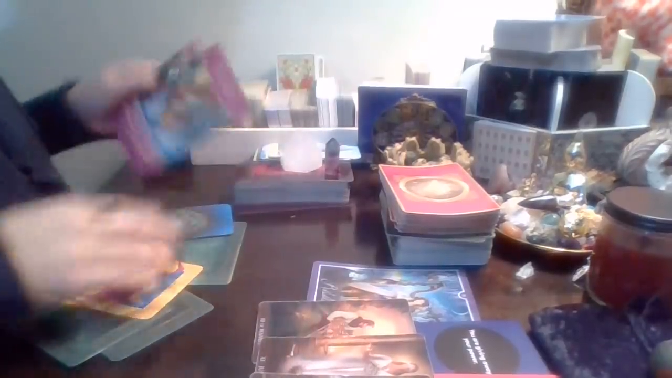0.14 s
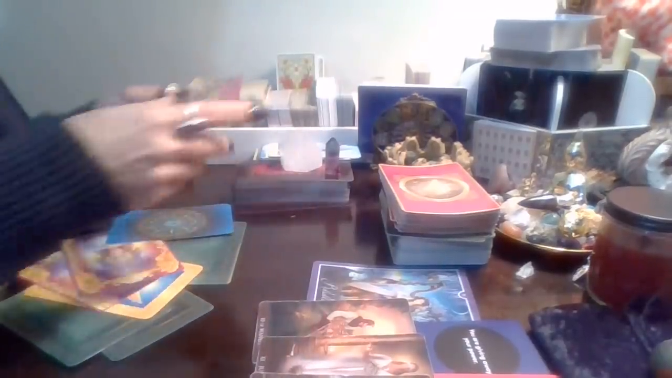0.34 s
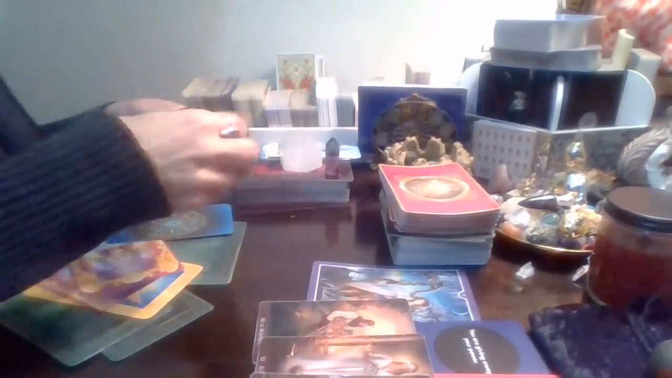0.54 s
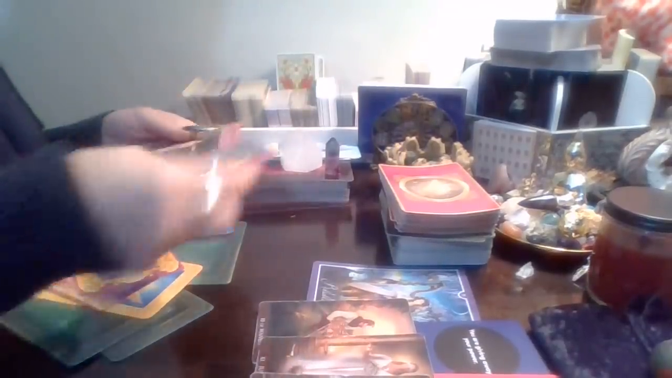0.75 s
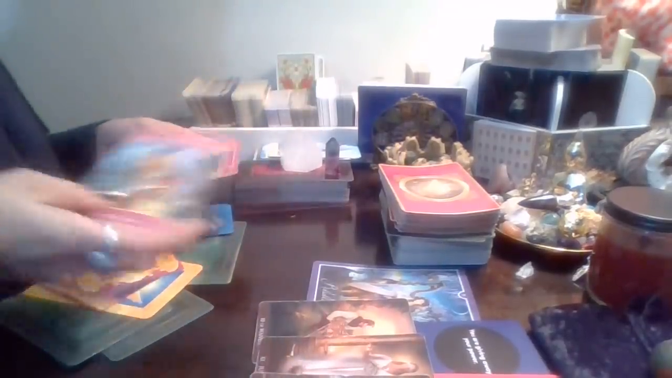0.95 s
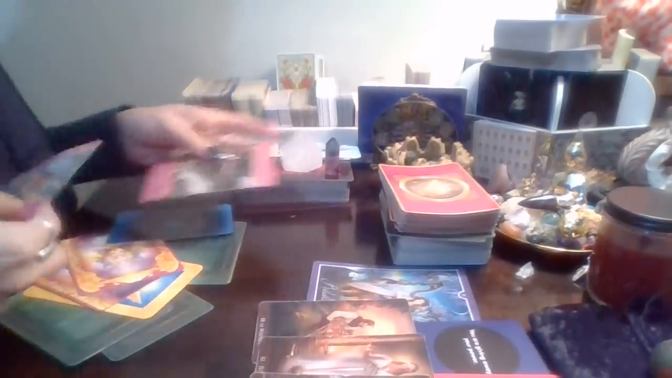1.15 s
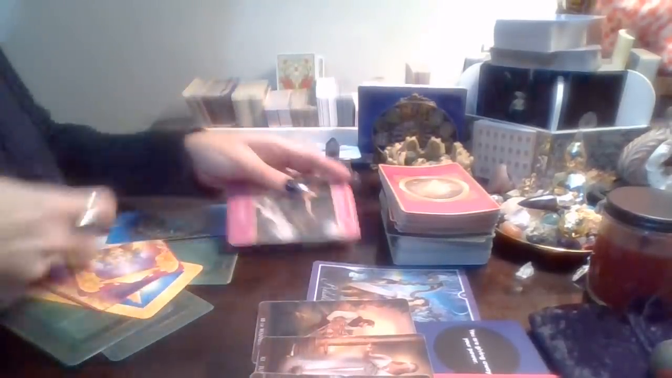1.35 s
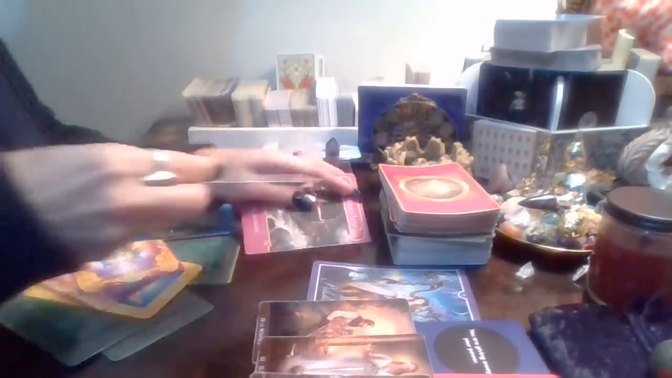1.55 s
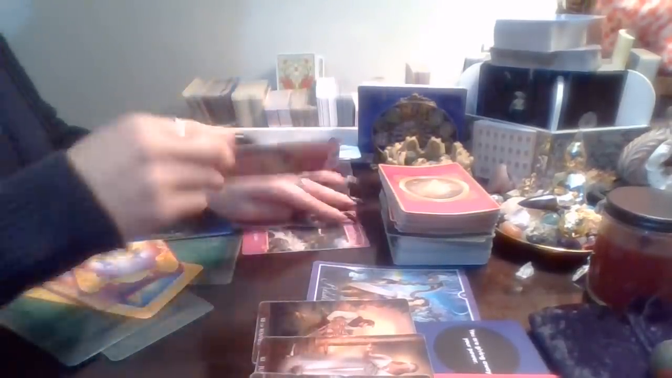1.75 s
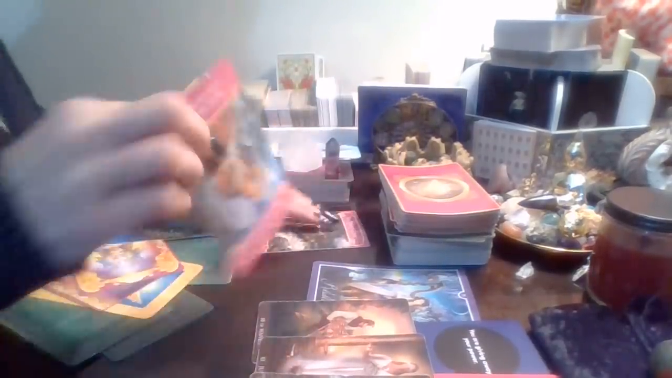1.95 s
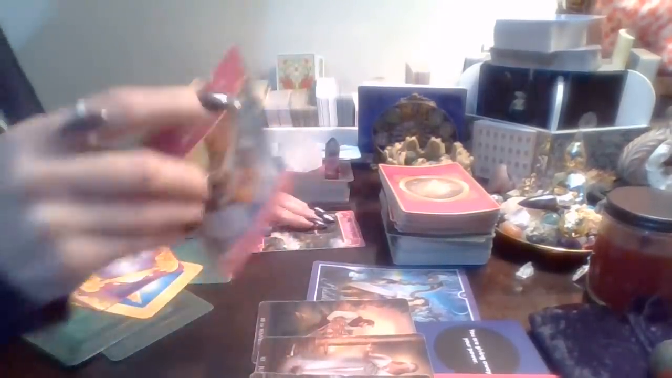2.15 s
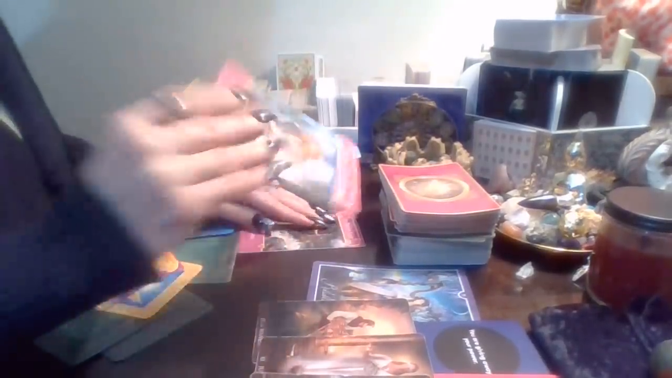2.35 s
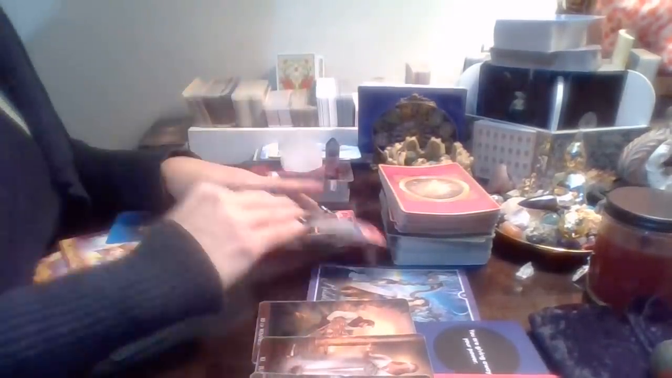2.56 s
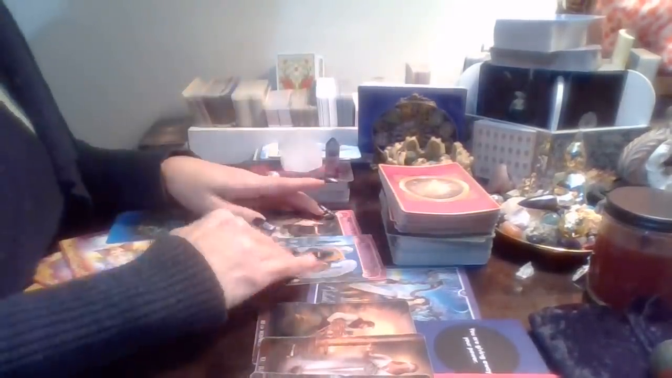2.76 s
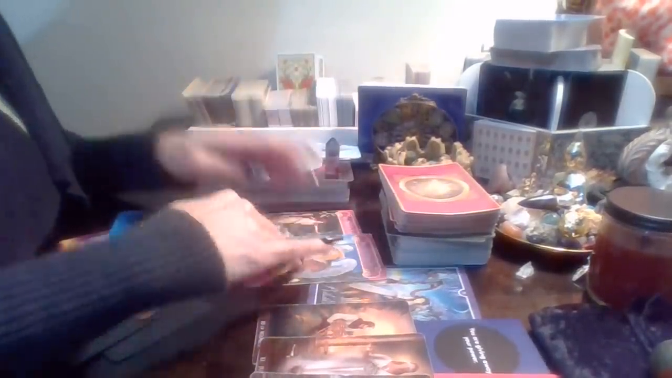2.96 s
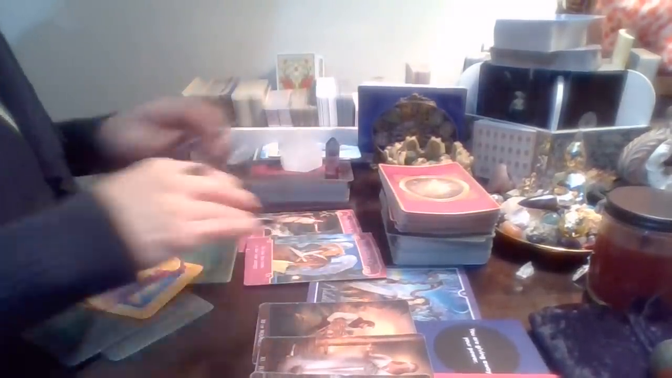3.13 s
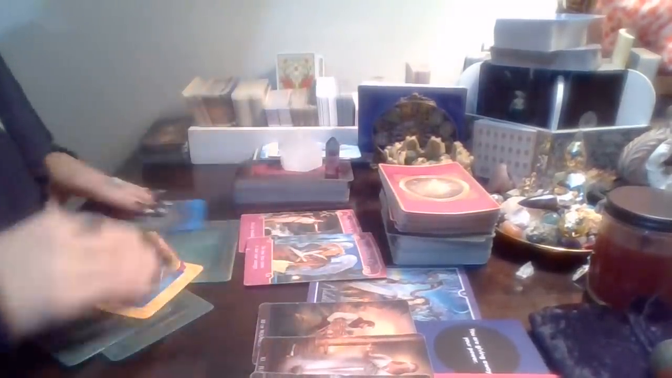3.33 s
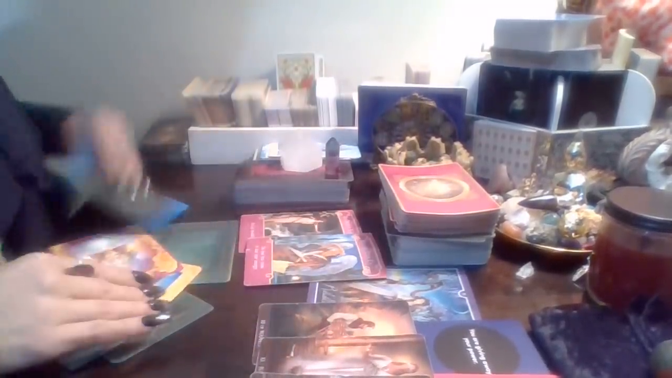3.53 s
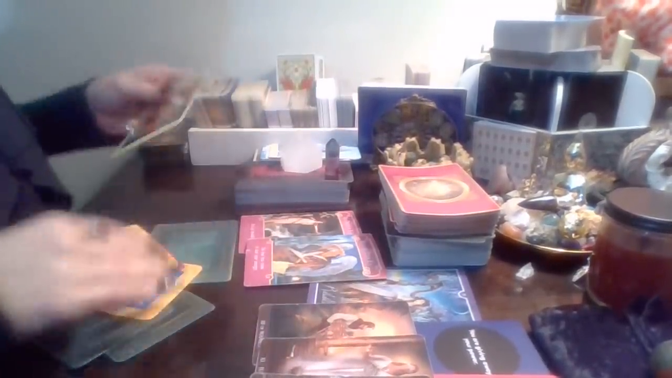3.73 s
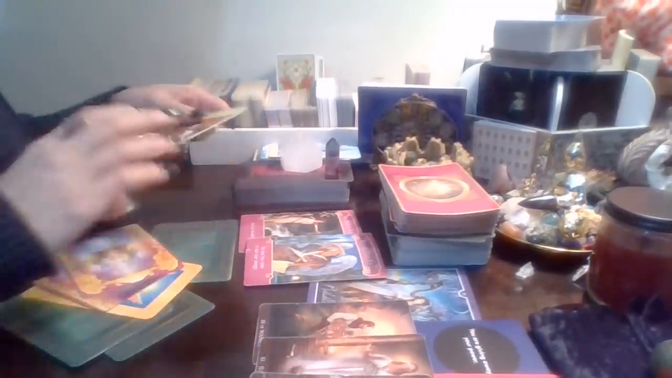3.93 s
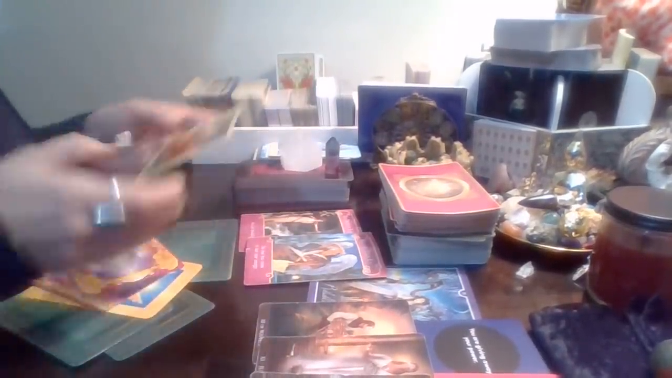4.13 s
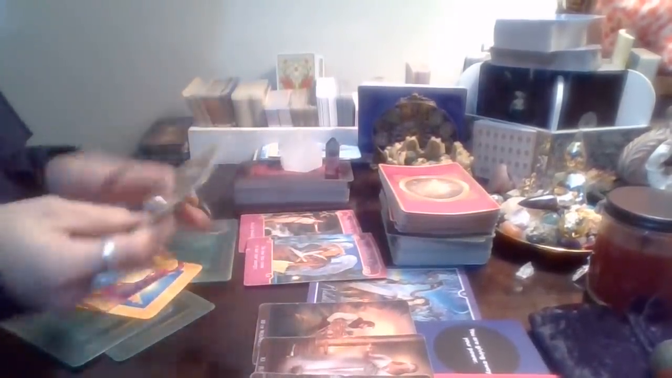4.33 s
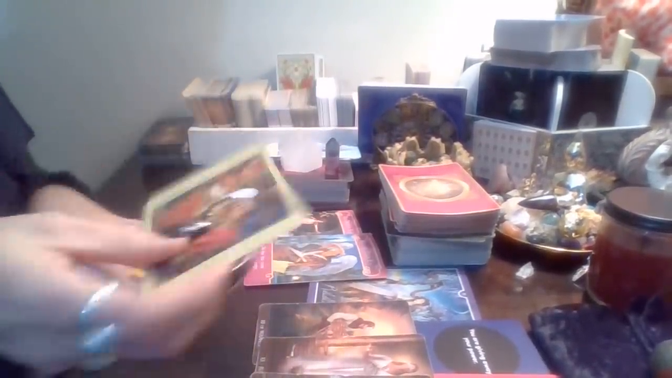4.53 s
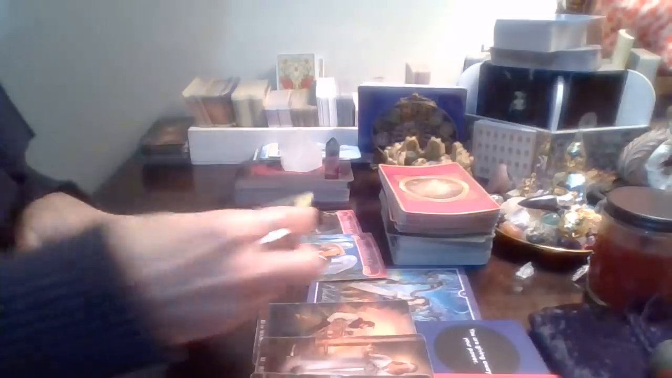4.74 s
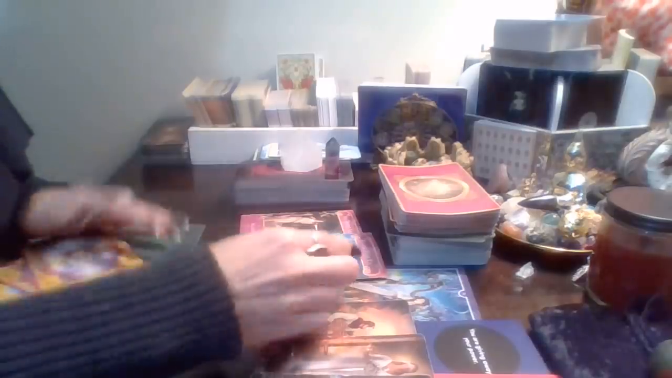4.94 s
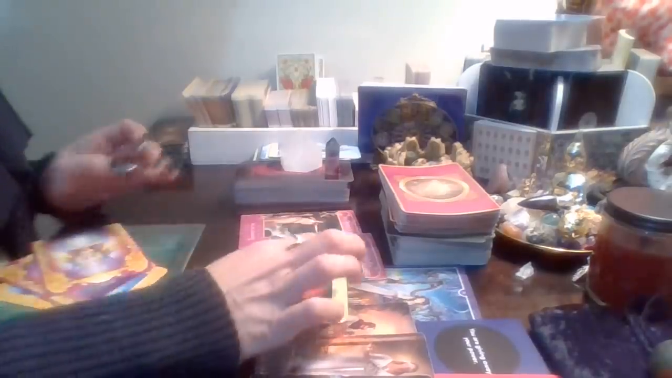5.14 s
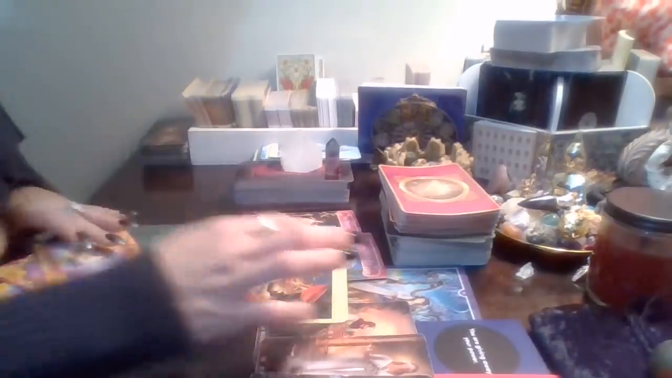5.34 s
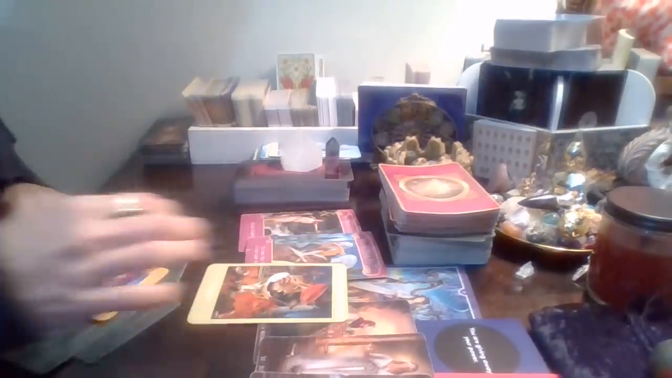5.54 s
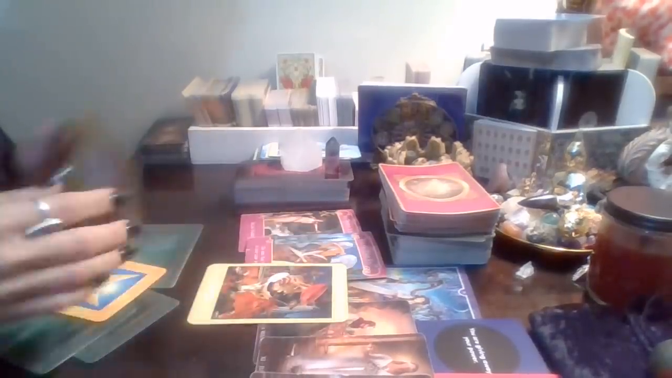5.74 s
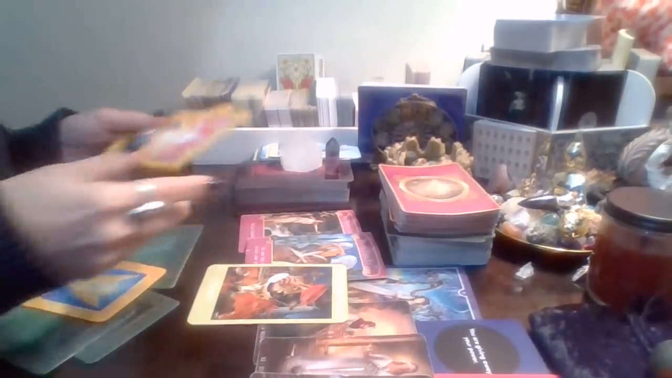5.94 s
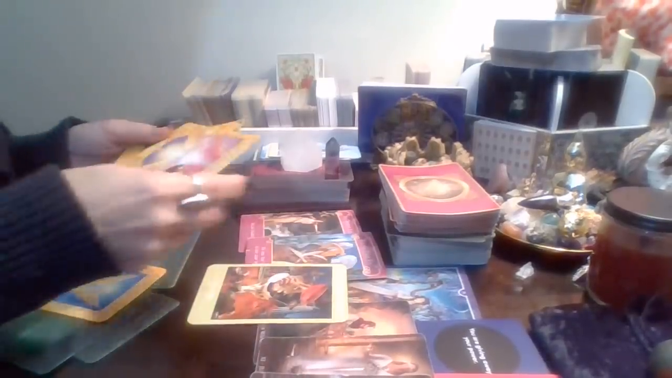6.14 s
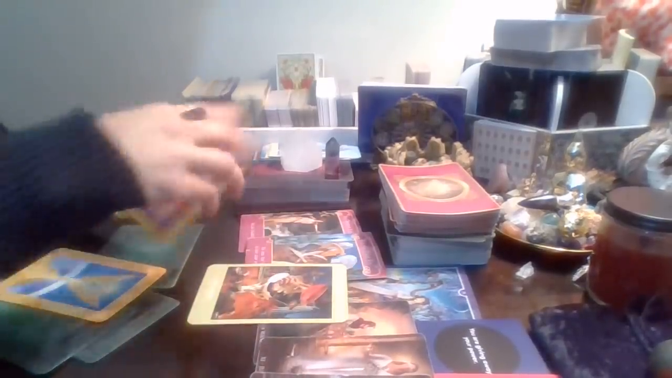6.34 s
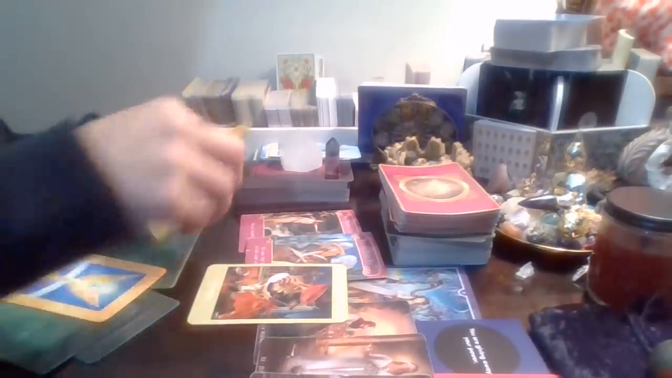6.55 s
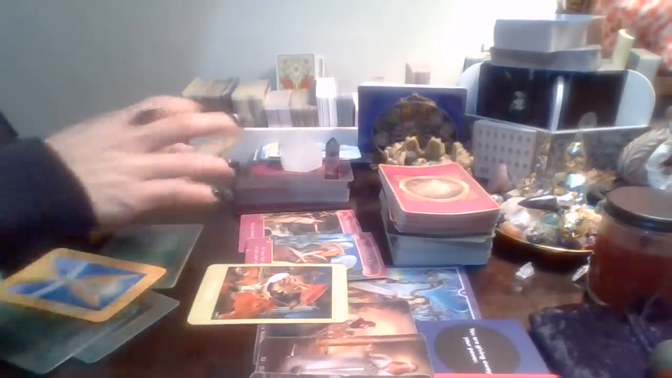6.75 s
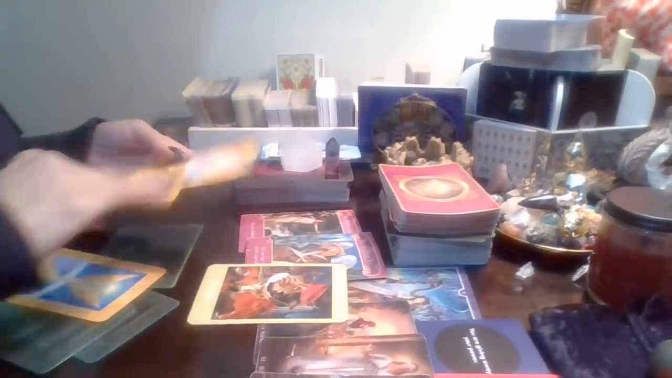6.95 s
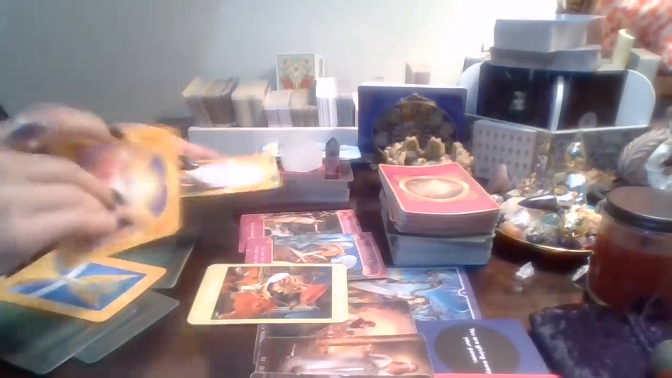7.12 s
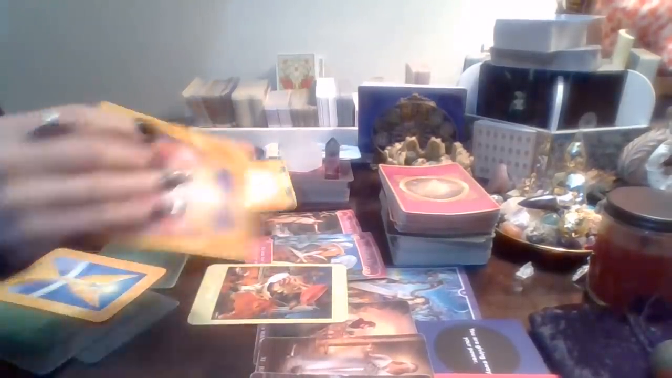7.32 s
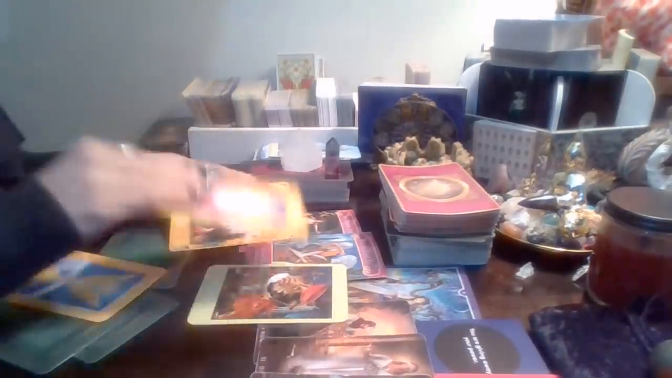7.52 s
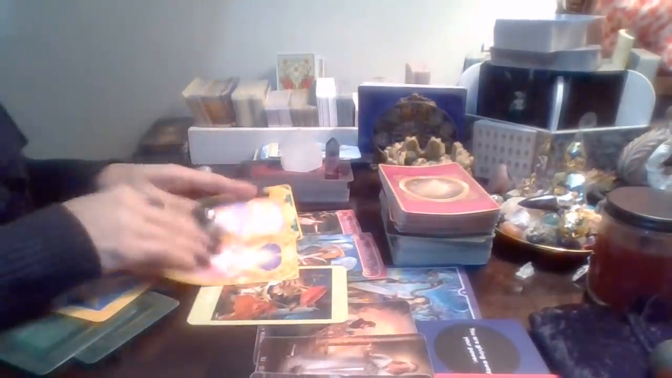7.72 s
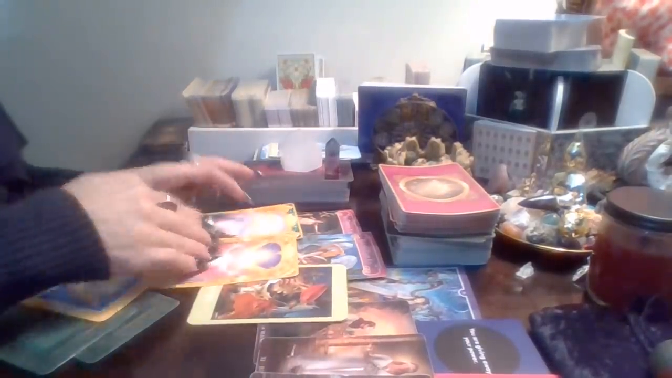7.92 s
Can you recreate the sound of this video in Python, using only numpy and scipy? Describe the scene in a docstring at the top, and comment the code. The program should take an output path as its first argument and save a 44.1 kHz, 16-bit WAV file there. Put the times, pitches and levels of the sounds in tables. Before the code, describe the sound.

Stiff cards snap free, flick and land with thuds on a wooden table, among faint finger ticks and a low wavering fan hum.

```python
"""A small fan hums over low noise, under faint finger ticks; then stiff cards are drawn, turned and laid down.
The hum is wavering sine tones, the background is shaped noise; ticks are coloured clicks, slides gritty noise.
A bent card scrapes, snaps free and rings: a whitened contact through the card's resonances.
Things on the crowded wooden table scatter the snap; the table's low modes thud under a laid card."""
import sys
import numpy as np
from scipy import signal
from scipy.fft import rfft, irfft
from scipy.io import wavfile
from scipy.ndimage import uniform_filter1d

SR = 44100
rng = np.random.default_rng(int(sys.argv[2]) if len(sys.argv) > 2 else 0)


def log_audio(samples):
    """Write samples as a 16-bit WAV file to the path given in sys.argv[1]."""
    # one column per channel
    frames = np.atleast_2d(samples).T
    # limit to full scale, then quantise
    limited = np.clip(frames, -1, 1)
    pcm = np.round(limited * 32767).astype(np.int16)
    wavfile.write(sys.argv[1], SR, pcm)


N = 356328

# spectrum of the background noise, a low rush and very faint high hiss:
# (frequency [Hz], relative level [dB])
BACKGROUND_SPECTRUM = [(30, -48.5), (96, -36.5), (118, 0.5), (175, 2), (280, -3), (330, -1), (450, -7.5),
                       (850, -5.5), (1400, -16.5), (2400, -21.5), (6500, -27), (7900, -39.5),
                       (15000, -40.5)]
# fan tones: (frequency [Hz], level before HUM_LEVEL and waver [dB rms])
FAN_TONES = [(248.1, -63.5), (150, -85.5), (185, -91.5), (315, -83.5), (495, -90.5), (635, -88.5),
             (3060, -101), (5977, -107)]
# level of the hum, followed in part by the background noise: (time [s], level [dB])
HUM_LEVEL = [(0, -4), (1.5, -2.5), (2.6, -4), (4.15, -3.5), (5.6, -4.5), (6.6, -6.5), (7.55, -6.5),
             (7.8, -1.5), (8.08, -3)]
# spectrum of a finger on a card: (frequency [Hz], relative level [dB])
FINGER_SPECTRUM = [(100, -41), (200, -19), (500, -7), (1100, 4.5), (2300, -1), (3300, -8), (5000, -5),
                   (6700, -9.5), (7600, -19), (9000, -51.5), (15000, -42.5)]
# a nail or card corner ticks: (time [s], energy level [dB], treble tilt [dB/octave])
TICKS = [(.0727, -46.5, 4), (.5826, -44, 1), (.7841, -36.5, -1.5), (.9482, -43.5, -1), (1.1762, -38.5, -1),
         (1.3229, -45.5, 0), (1.3663, -42.5, 0), (1.4426, -44.5, -5), (1.5968, -41, -3),
         (1.8831, -46, -1.5), (2.0048, -40, 1), (2.027, -38.5, 0), (2.7661, -37.5, -5.5),
         (3.5139, -38.5, -2), (4.0781, -43, -2), (4.2905, -42, 11), (4.4069, -44, -2),
         (4.7787, -36.5, -3.5), (5.0709, -39, -1), (5.4924, -42, 0.5), (6.4672, -40, -4), (7.1142, -42, 2),
         (7.1586, -35, -1.5), (7.198, -38, -1.5), (7.3891, -43, 2), (7.5078, -38.5, -3.5), (7.677, -39, 1),
         (7.756, -42, -1.5), (7.8945, -48.5, 12)]
# fingers shift their hold, with fainter ticks at random: (start [s], end [s])
FUMBLES = [(0.129, 0.34), (1.19, 1.53), (4.42, 4.63), (4.94, 5.01), (6.2, 6.24), (6.69, 6.73), (7.29, 7.6),
           (7.72, 7.75)]
# card slides on card or under a finger:
# (middle [s], length [s], rms level before the fades [dB], resonance [Hz])
SLIDES = [(0.788, 0.32, -81.5, 5800), (0.937, 0.17, -80.5, 1910), (1.181, 0.12, -73.5, 1290),
          (1.686, 0.08, -65.5, 1400), (1.759, .05, -78, 6300), (2.806, 0.024, -57.5, 1410),
          (3.522, 0.14, -80, 3040), (4.519, .28, -79, 1904), (6.486, 0.12, -70, 1420),
          (7.034, .07, -69.5, 6200), (7.115, 0.13, -77.5, 2290), (7.352, .057, -73, 2400),
          (7.75, 0.043, -71, 1815), (7.879, 0.035, -66.5, 2090)]
# table-top modes: (frequency [Hz], relative level [dB], t60 [s])
TABLE_MODES = [(70, -29.5, 0.084), (138, -11, 0.074), (173.3, -4, 0.14), (213.5, -5.5, 0.11),
               (248, -13, 0.15), (314.6, -11, 0.1), (386, -21.5, 0.11)]
# hand and card press on the table:
# (time [s], peak level [dB], length [s], hardness of the push [dB/octave])
THUDS = [(1.712, -60, 0.022, -10), (2.1, -54, 0.033, 11.5), (2.818, -19, 0.055, 1), (3.293, -33, 0.04, 2),
         (3.433, -38, 0.058, -11.5), (4.503, -59, 0.049, 1), (5.114, -19.5, 0.058, 2.5),
         (7.805, -18.5, 0.049, -5.5), (7.846, -41.5, .057, 2)]
# spectrum of a card: (frequency [Hz], relative level [dB])
CARD_SPECTRUM = [(100, -20.5), (200, 2.5), (300, -2.5), (700, -3), (1200, -3.5), (2300, -5.5), (3300, -9.5),
                 (4600, -11), (5700, -13), (6700, -13), (7500, -23), (8300, -33.5), (9200, -54),
                 (15000, -58.5)]
# bending modes of a card: (multiple of bending pitch [-], height [dB])
BENDING_MODES = [(.5, 5.5), (1, 10.5), (2.3, 9), (4.6, 3.5)]
# a card snaps free or lands: (time [s], energy level [dB], bending pitch [Hz],
# ring of the flicked corner [Hz], its height [dB], bass edge [Hz], treble tilt [dB/octave],
# scatter [dB], scatter length [s], rise of the scrape before it [s])
SNAPS = [ (.8319, -14, 1110, 4400, 11.5, 310, -1.5, 13.5, .011, 0.00017),
         (1.0134, -16, 1180, 1710, 16.5, 1030, -2.5, 1, 0.01, 0.0041),
         (1.5123, -13, 1080, 550, 6.5, 700, -1, 2.5, 0.02, .0009),
         (1.6397, -11, 1124, 1320, 14, 1080, -0.6, 10, 0.019, 0.0045),
         (1.718, -7, 1360, 2480, 6.5, 150, -2, 5, 0.023, 0.0022),
         (1.804, -6, 1270, 556, 17, 246, -1.5, -7.5, 0.022, 0.00092),
         (2.105, 0, 916, 662.5, 7, 170, 0.3, -2, .034, .001),
         (2.8179, 6.5, 927, 1324, 10, 170, -.6, 0.5, 0.058, 0.00083),
         (3.2821, -9, 940, 4280, 10, 101, 5, -7, 0.028, 0.0005),
         (3.4278, -8, 1000, 5000, 9, 99.5, 5, -3, 0.074, 0.00078),
         (4.312, -6.5, 1124, 780, 5, 900, 2, -2, 0.031, 0.0025),
         (5.1158, 3, 1190, 4260, 8, 100, 0.06, -3.5, 0.057, 0.0012),
         (5.843, -9.5, 1160, 2094, 14, 130, 2.5, 3, 0.023, 0.00056),
         (6.9353, 3.5, 1070, 613, 9.5, 560, -1, -12.5, 0.061, 0.00021),
         (6.9672, -5, 1084, 2660, 4, 700, -0.7, -1.5, 0.084, 0.00052),
         (7.2213, -5, 854, 1247, 13.5, 100, 2, -5.5, .04, 0.00075),
         (7.7789, -10, 1049, 1620, 8, 1030, .5, 4, 0.037, 0.0015),
         (7.802, -1.5, 900, 4720, 4, 300, 1, 2, 0.068, .001)]
# the edge catches just before or after a snap, in the same grip:
# (time [s], energy level [dB], extra tilt [dB/octave], scatter length [s])
CATCHES = [(1.6528, -14.5, -2, 0.014), (1.68, -25, -1.5, 0.015), (2.099, -5, 2, 0.051),
           (2.813, -1, 2.5, .042), (3.29, -16, 1.5, 0.047), (3.423, -14, 0, 0.039),
           (6.944, -3.5, 0.5, .055), (6.9839, -10, 0, 0.034), (7.2338, -13, -1.5, 0.037),
           (7.261, -25.5, -0.5, 0.045), (7.7964, 0, 1.5, 0.067), (7.8584, -22, 1, 0.0099)]

SIZE = 8192  # samples in a contact or filter buffer
CENTRE_S = SIZE / 2 / SR  # a contact clicks here in its buffer
TIME_S = np.arange(N) / SR
FREQ_HZ = np.maximum(np.arange(SIZE // 2 + 1) * SR / SIZE, 60)
TILT_PIVOT_HZ, TOP_HZ = 1500, 15500
BACKGROUND_DB = -74.5
FUMBLE_PER_S, FUMBLE_DB, FUMBLE_SPREAD_DB, FUMBLE_TILT_DB_PER_OCT = 22, -52, 5, -0.5
CATCH_SCATTER_DB, SNAP_SCATTER_T60_S = -0.5, 0.075


def undb(db):
    """Decibels to gain."""
    return 10 ** (np.asarray(db) / 20)


def unit(x):
    """Scale to an energy of one."""
    return x / np.sqrt(np.sum(x ** 2))


def add(out, start_s, x):
    """Mix x into out from start_s on, trimming what falls outside."""
    i = int(round(start_s * SR))
    x, i = x[max(-i, 0):], max(i, 0)
    out[i:i + len(x)] += x[:max(N - i, 0)]


def decay(t_s, t60_s):
    """Exponential decay by 60 dB in t60_s."""
    return np.exp(-np.log(1000) * t_s / t60_s)


def cutoff(t_s, length_s):
    """Smooth but steep end at length_s."""
    return 1 / (1 + (t_s / length_s) ** 16)


def walk(rate_hz):
    """Slow random drift about zero: held random values, smoothed twice."""
    k = int(SR / rate_hz)
    held = np.repeat(rng.standard_normal(N // k + 1), k)
    return uniform_filter1d(uniform_filter1d(held, k), k)[:N]


def shape(points):
    """Join (Hz, dB) points on a log-frequency axis."""
    hz, db = np.transpose(points)
    return np.interp(np.log(FREQ_HZ), np.log(hz), db)


def tilt(db_per_octave):
    """Spectral slope that turns about TILT_PIVOT_HZ."""
    return db_per_octave * np.log2(FREQ_HZ / TILT_PIVOT_HZ)


def resonance(hz, width_hz=45, damping=0.1):
    """Bump of height one; higher resonances of the stiff paper are wider and die sooner."""
    return 1 / (1 + ((FREQ_HZ - hz) / (width_hz + damping * hz)) ** 2)


def response(gain_db):
    """Minimum-phase impulse response of unit energy, from a folded cepstrum."""
    cepstrum = irfft(np.log(undb(gain_db)))
    cepstrum[1:SIZE // 2] *= 2
    cepstrum[SIZE // 2 + 1:] = 0
    return unit(irfft(np.exp(rfft(cepstrum)))[:SIZE // 2])


def whiten(x, bins=61):
    """Even out a contact's broad colour so the card alone sets its tone; the attack stays sharp."""
    power = uniform_filter1d(abs(rfft(x)) ** 2, bins)
    return signal.fftconvolve(x, response(-10 * np.log10(power)))


def grit(n, spread_db):
    """Stick-slip noise: tiny slips of very unequal size."""
    slip_db = spread_db * np.minimum(rng.exponential(size=n), 5)
    return unit(rng.standard_normal(n) * undb(slip_db))


def contact(scatter_db, t60_s, length_s, rise_s, scrape_db=-5, chatter_db=0, chatter_s=0.0028):
    """A scrape swells into a click at mid-buffer, which chatters and is scattered by nearby things."""
    t_s = (np.arange(SIZE) - SIZE // 2) / SR
    after_s = np.maximum(t_s, 0)
    click = t_s == 0
    scrape = unit(grit(SIZE, spread_db=2.5) * np.exp(-abs(t_s) / rise_s) * (t_s < 0))
    chatter = unit(grit(SIZE, spread_db=0.91) * np.exp(-after_s / chatter_s) * (t_s > 0))
    fade = decay(after_s, t60_s) * cutoff(after_s, length_s)
    onset = np.minimum(after_s / 0.0011, 1)
    scatter = unit(rng.standard_normal(SIZE) * fade * onset)
    return click + undb(scrape_db) * scrape + undb(chatter_db) * chatter + undb(scatter_db) * scatter


def hum_level_db():
    """Level of the hum over time."""
    return np.interp(TIME_S, *np.transpose(HUM_LEVEL))


def background_noise(hum_share=0.73):
    """Shaped noise whose level drifts and follows part of the hum's."""
    white = rng.standard_normal(N + SIZE)
    noise = signal.fftconvolve(white, response(shape(BACKGROUND_SPECTRUM)))[SIZE:SIZE + N]
    return noise * undb(BACKGROUND_DB + hum_share * hum_level_db() + 0.2 * walk(5))


def fan_hum(waver_db=-1.5, phase_drift_rad=0.93):
    """A strong blade tone and faint motor lines, wavering in level and phase."""
    tones = np.zeros(N)
    for hz, db in FAN_TONES:
        amplitude = np.sqrt(2) * undb(db + waver_db * walk(7.4))
        tones += amplitude * np.sin(2 * np.pi * hz * TIME_S + phase_drift_rad * walk(7.8))
    return tones * undb(hum_level_db())


def fumbles():
    """Faint ticks at uneven moments while the hold shifts, as TICKS rows."""
    ticks = []
    for start_s, end_s in FUMBLES:
        count = max(round((end_s - start_s) * FUMBLE_PER_S), 1)
        for k in range(count):
            s = start_s + (end_s - start_s) * (k + rng.random()) / count
            db = FUMBLE_DB + FUMBLE_SPREAD_DB * rng.standard_normal()
            ticks.append((s, db, FUMBLE_TILT_DB_PER_OCT))
    return ticks


def finger_ticks(ring_db=4):
    """Light contacts; each rings the card at three random places in its spectrum."""
    out = np.zeros(N)
    for s, db, tilt_db in list(TICKS) + fumbles():
        touch = contact(scatter_db=0, t60_s=0.15, length_s=0.074, rise_s=0.0007)
        rings = sum(resonance(hz) for hz in rng.uniform(1100, 4300, size=3))
        colour = response(shape(FINGER_SPECTRUM) + ring_db * rings + tilt(tilt_db))
        add(out, s - CENTRE_S, undb(db) * unit(signal.fftconvolve(touch, colour)))
    return out


def finger_slides(ring_db=8):
    """Short stick-slip noises that swell and fade through one paper resonance."""
    out = np.zeros(N)
    for middle_s, length_s, db, hz in SLIDES:
        n = int(length_s * SR)
        slips = grit(n, spread_db=4.5) * np.sqrt(n) * np.hanning(n)
        paper = response(shape(FINGER_SPECTRUM) + ring_db * resonance(hz, damping=0.054))
        add(out, middle_s - length_s / 2, undb(db) * signal.fftconvolve(slips, paper))
    return out


def table_thuds(swell_s=0.015, detune=0.023, phase_spread_rad=0.5073):
    """The table's low modes build up together under the push and end steeply at each thud's length."""
    out, t_s = np.zeros(N), np.arange(SIZE) / SR
    for s, db, length_s, hard_db in THUDS:
        ring = np.zeros(SIZE)
        for hz, mode_db, t60_s in TABLE_MODES:
            shift, turn = rng.standard_normal(2)
            mode_hz = hz * (1 + detune * shift)
            wave = np.sin(2 * np.pi * mode_hz * (t_s - swell_s) + phase_spread_rad * turn)
            ring += undb(mode_db + hard_db * np.log2(hz)) * decay(t_s, t60_s) * wave
        ring *= (1 - np.exp(-(t_s / swell_s) ** 2)) * cutoff(t_s, length_s)
        add(out, s, undb(db) * ring / abs(ring).max())
    return out


def card_response(pitch_hz, corner_hz, corner_db, edge_hz, tilt_db):
    """Each grip frees another length of card, moving its bending modes together and its bass edge."""
    bending = sum(db * resonance(multiple * pitch_hz) for multiple, db in BENDING_MODES)
    corner = corner_db * resonance(corner_hz)
    bass = -10 * np.log10(1 + (edge_hz / FREQ_HZ) ** 4)
    return response(shape(CARD_SPECTRUM) + bending + corner + bass + tilt(tilt_db))


def catches():
    """Edge catches as SNAPS rows, each in the grip of the nearest snap."""
    hits = []
    for s, db, extra_tilt_db, length_s in CATCHES:
        nearest = min(SNAPS, key=lambda snap: abs(snap[0] - s))
        _, _, *grip, tilt_db, _, _, rise_s = nearest
        hits.append((s, db, *grip, tilt_db + extra_tilt_db, CATCH_SCATTER_DB, length_s, rise_s))
    return hits


def card_snaps():
    """A whitened contact rings the card as gripped."""
    out = np.zeros(N)
    for s, db, *grip, scatter_db, length_s, rise_s in list(SNAPS) + catches():
        touch = whiten(contact(scatter_db, SNAP_SCATTER_T60_S, length_s, rise_s))
        snap = signal.fftconvolve(touch, card_response(*grip))
        add(out, s - CENTRE_S, undb(db) * unit(snap))
    return out


def scene():
    """Background, fan, fingers, table and cards at one microphone."""
    handling = finger_ticks() + finger_slides()
    return (background_noise() + fan_hum() + handling + table_thuds() + card_snaps())[None]


def record(dry):
    """The recorder cuts the top: a steep elliptic low-pass at TOP_HZ."""
    low_pass = signal.ellip(8, 0.2, 70, TOP_HZ, fs=SR, output="sos")  # ripple, stopband [dB]
    return signal.sosfilt(low_pass, dry)


dry = scene()
out = record(dry)
log_audio(out)
```